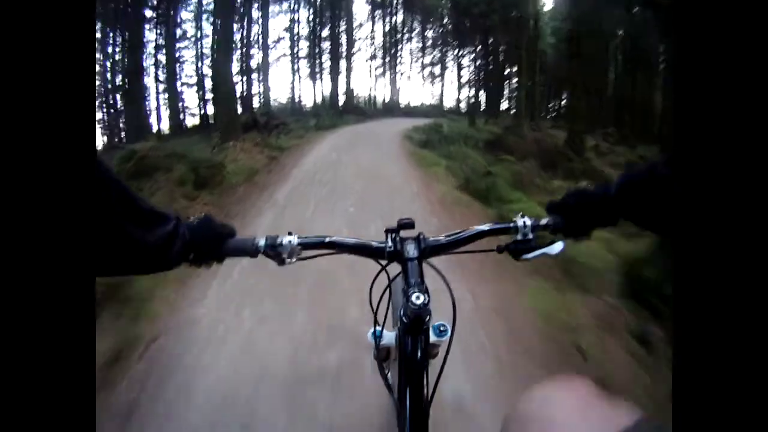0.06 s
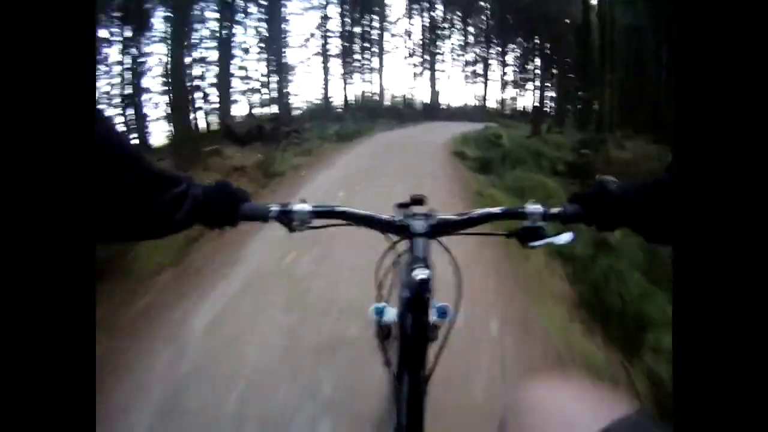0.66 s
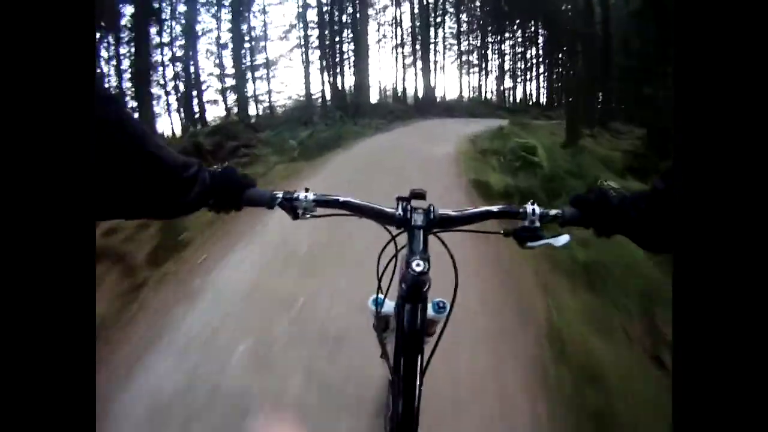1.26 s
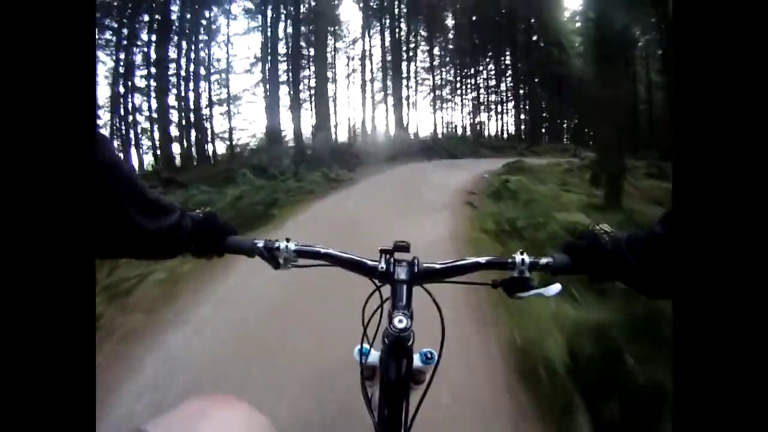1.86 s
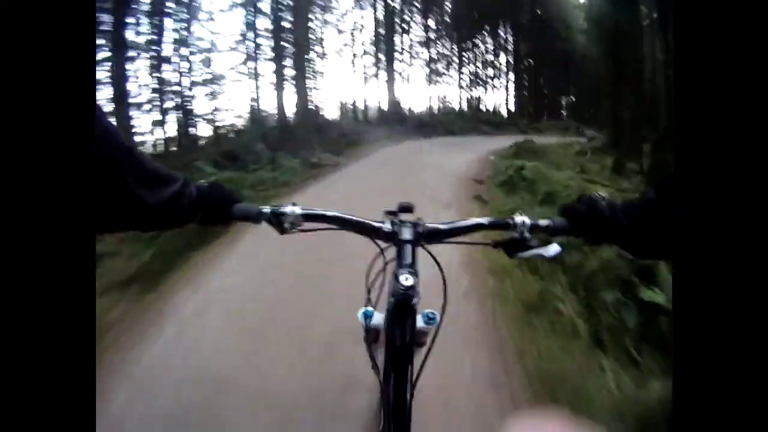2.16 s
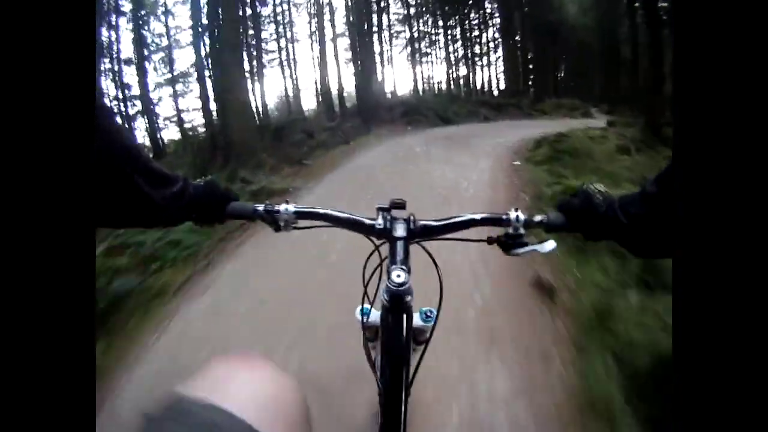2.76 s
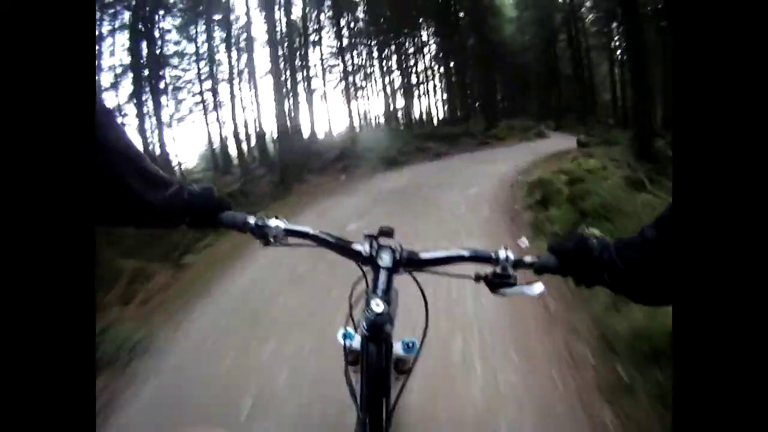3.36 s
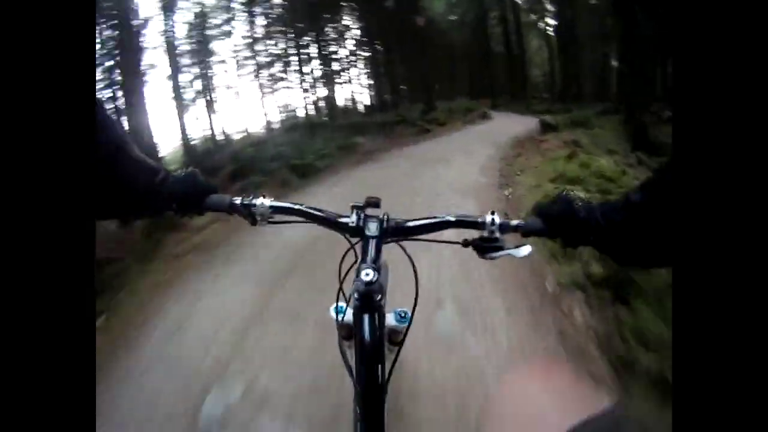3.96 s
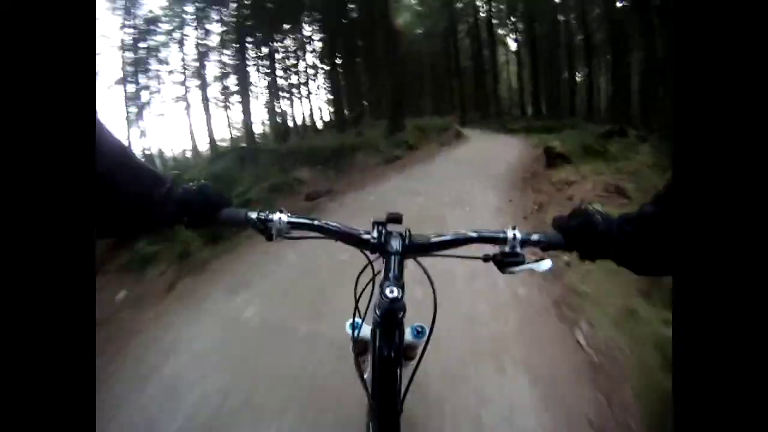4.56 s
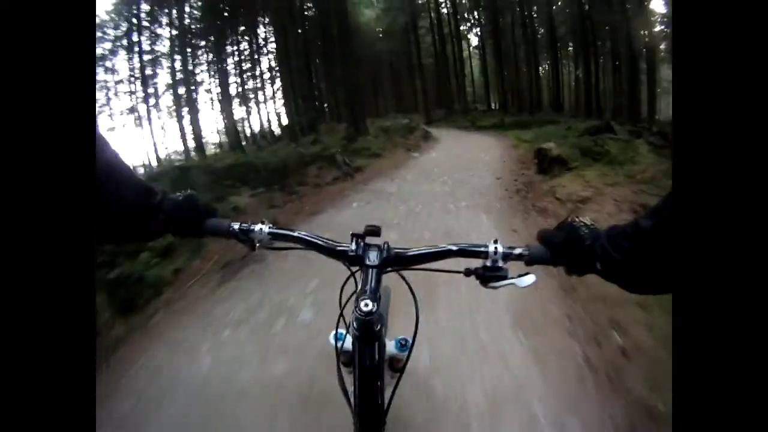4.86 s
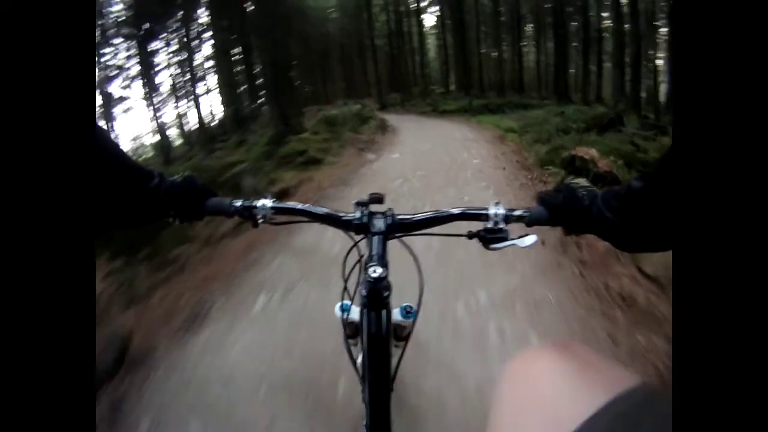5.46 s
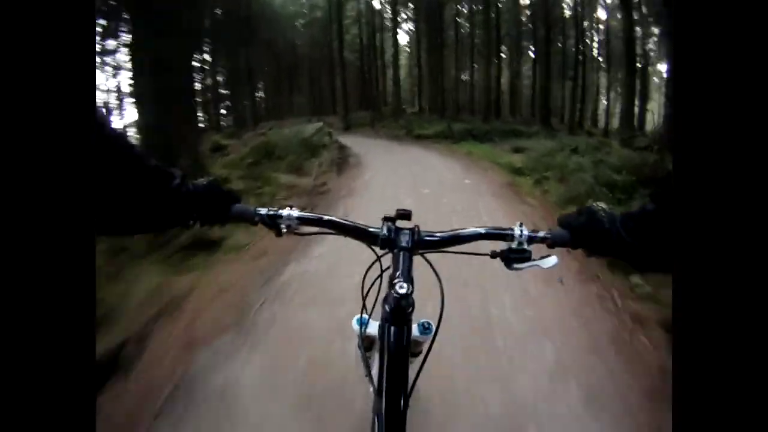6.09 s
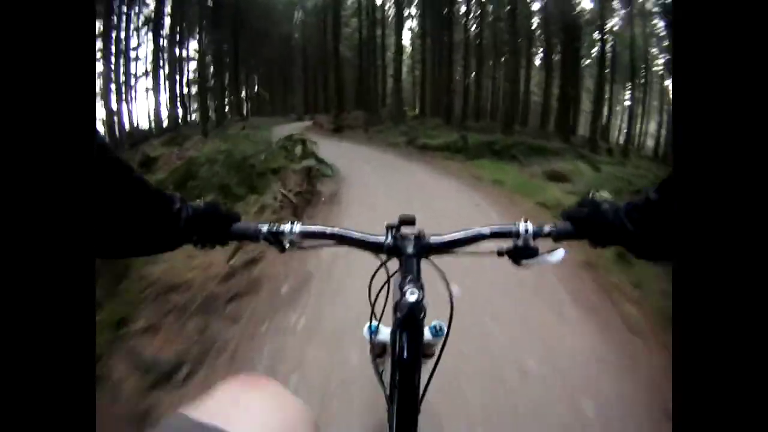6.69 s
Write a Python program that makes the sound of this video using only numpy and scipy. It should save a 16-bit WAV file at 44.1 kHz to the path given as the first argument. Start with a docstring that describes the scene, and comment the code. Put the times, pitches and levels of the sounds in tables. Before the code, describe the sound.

A mountain bike rolls fast along a gravel forest trail for nearly seven seconds, heard close from a camera in a plastic case on the rider's chest. The tyres crunch continuously with a gritty treble and short surges, above a low rumble of rough ground and gusting wind. At about 0.4 seconds the case knocks sharply, followed at once by a dull thump and a clack. A second strong jolt, with knock, thump and rattle, comes just before 2 seconds. From 2.5 to 4 seconds loose parts clack repeatedly and stones tick on the frame, among softer knocks and bumps. The crunch swells several times between 4.3 and 4.8 seconds. A small thump lands at 5 seconds, a gust at 5.4 and a clack at 5.9. The sharpest hollow knock hits at 6.3 seconds with a burst of gravel, before a last gust.

```python
"""Tyres crunch on gravel as a mountain bike runs fast down a forest trail, heard from a camera in a
plastic case on the rider's chest. The many small impacts excite the resonances of the case, while
wind and rough ground rumble below. Bumps thump, loose parts clack, stones tick on the frame and the
case knocks on its mount. The camera samples slowly and holds each sample, which mirrors the spectrum
into a gritty treble."""
import sys
import numpy as np
from scipy import signal
from scipy.fft import rfft, irfft, next_fast_len
from scipy.io import wavfile
from scipy.ndimage import map_coordinates

SR = 44100
rng = np.random.default_rng(int(sys.argv[2]) if len(sys.argv) > 2 else 0)


def bounce(signal):
    """Save signal as a 16-bit WAV file at the path given by the first command-line argument."""
    frames = np.transpose(np.atleast_2d(signal))
    limited = np.clip(frames, -1, 1)
    pcm = np.round(limited * 32767).astype(np.int16)
    wavfile.write(sys.argv[1], SR, pcm)


N = 296738

# gusts on the case: peak_s, level_db, length_s
GUSTS = [(0.536, -41, .25), (1.28, -39, 0.17), (1.625, -39, 0.46), (1.963, -38.5, .17), (2.624, -42, 0.22),
         (2.946, -54, 0.079), (3.55, -38.5, 0.13), (3.812, -42.5, 0.11), (4.13, -46, 0.22),
         (4.977, -37.5, 0.1), (5.406, -35, 0.15), (6.69, -33, 0.17)]
# rumble from the roughness of the ground: time_s, level_db
GROUND_LEVEL = [(0.1, -60.5), (0.4, -55.5), (0.8, -59), (1.5, -60.5), (1.9, -54), (2.15, -59), (2.5, -56),
                (3.1, -64), (3.45, -57.5), (4.27, -58), (4.45, -63), (4.7, -53.5), (4.9, -60), (5.35, -59),
                (6.0, -62.5), (6.27, -55.5), (6.73, -62)]
# spectra of the wind and the ground rumble: frequency_hz, level_db
WIND_SPECTRUM = [(10, -9.5), (18, 2.5), (26, 2.5), (36, -8), (50, -11.5), (70, -18.5), (130, -26),
                 (260, -56)]
RUMBLE_SPECTRUM = [(40, -9.5), (80, -0.5), (120, -4), (200, -4), (270, -9.5), (370, -20), (600, -21),
                   (1200, -34)]
# bumps that jolt the rider: start_s, level_db, pitch_hz
BUMPS = [(0.470, -20, 102), (1.827, -34, 110), (1.956, -23.5, 92), (2.020, -41, 129), (2.58, -37, 65),
         (2.989, -37.5, 54.6), (3.383, -36, 54.4), (5.009, -31, 78), (5.105, -45, 173), (6.181, -37, 61.5),
         (6.292, -34.5, 167)]
# modes of the jolted body: pitch_ratio, level_db, t60_s
BODY_MODES = [(1, 5, 0.042), (1.6, 0, 0.0394), (2.2, -20.5, 0.068)]
# knocks of the case on its mount: start_s, level_db, cutoff_hz
KNOCKS = [(0.372, -17, 1830), (0.489, -32.5, 1300), (1.029, -39, 900), (1.942, -17, 2600),
          (2.409, -39.5, 750), (2.531, -30.5, 725), (3.509, -31.5, 950), (4.061, -32.5, 734),
          (6.293, -13, 3360), (6.388, -45, 900)]
# clacks of loose parts and ticks of flung stones: start_s, level_db, pitch_hz
CLACKS = [(0.2169, -33.5, 2430), (0.4697, -22.5, 1780), (1.0801, -32.5, 1840), (1.4406, -41, 2030),
          (1.9545, -25.5, 1840), (1.984, -38.5, 2000), (2.618, -30.5, 1940), (2.6817, -31, 2160),
          (2.725, -35, 2000), (2.8442, -27, 1950), (2.9886, -38, 2000), (3.2575, -35.5, 2440),
          (3.4406, -30.5, 2640), (3.6682, -25.5, 2700), (3.724, -38.5, 2520), (4.458, -35, 1950),
          (5.4026, -36, 2030), (5.6391, -36.5, 1850), (5.7334, -37, 2020), (5.9224, -28, 2300),
          (5.932, -35, 2270), (6.4343, -36, 2630), (6.6502, -39.5, 2110)]
STONES = [(0.473, -40, 5340), (0.752, -46, 4300), (1.134, -45, 3100), (1.741, -35, 4120),
          (1.915, -44, 3100), (1.954, -36.5, 5100), (2.074, -44, 4800), (2.138, -40, 3570),
          (2.146, -42.5, 4600), (2.613, -42, 4600), (3.44, -40, 3500), (3.667, -41, 2970),
          (3.980, -53, 3400), (4.997, -51, 5560), (5.921, -42.5, 3200), (5.929, -45, 3200)]
# spectra of a knock, a clack and a stone's tick: frequency_hz, level_db
KNOCK_SPECTRUM = [(200, -24), (540, -31), (670, -4), (760, -8), (880, 5), (1050, -8.5), (1230, -5.5),
                  (1600, -10.5), (2170, -6.5), (2380, -18.5), (2520, -37), (2750, -24), (5500, -34)]
CLACK_SPECTRUM = [(600, -14), (1250, 0.5), (1430, -12), (1900, 4.5), (2550, 0.5), (2850, -14), (3120, -3),
                  (3400, -17.5), (5000, -22)]
STONE_SPECTRUM = [(1000, -27), (2500, -8), (3500, 5), (5000, -0.5), (6000, 0.5)]
# resonances of the case and spectrum of the grit: frequency_hz, level_db
CASE_SPECTRUM = [(250, -46), (550, -29), (750, -21), (900, -10.5), (1080, -14), (1220, -5), (1350, -10.5),
                 (1650, -9), (2000, 1), (2200, -1.5), (2380, -24), (2550, -8.5), (2820, -30), (5800, -29)]
GRIT_SPECTRUM = [(300, -4.5), (600, -9), (1250, 0.5), (1700, -7.5), (2550, 6.5), (2820, -8), (3100, -1),
                 (3400, -4), (4650, -12.5), (4930, -7), (5200, -16.5), (6000, -17.5)]
# crunch of steady rolling: time_s, level_db
ROLL_LEVEL = [(0.1, -52.5), (0.33, -56.5), (0.55, -53.5), (1.1, -49), (1.33, -55.5), (1.8, -50),
              (2.05, -53.5), (2.4, -57.5), (2.6, -48.5), (2.9, -58), (3.3, -54), (3.85, -53), (4.4, -55),
              (4.7, -52), (4.87, -54.5), (5.2, -55.5), (6.05, -54), (6.73, -56)]
# the tread bites into looser gravel: peak_s, level_db, length_s
BITES = [(0.157, -42.5, 0.072), (0.252, -50.5, 0.075), (0.411, -40, 0.069), (0.625, -51, 0.061),
         (0.864, -42.5, 0.044), (1.02, -48, 0.089), (1.117, -44.5, 0.072), (1.217, -45.5, 0.027),
         (1.455, -42, 0.024), (1.577, -43, 0.082), (1.774, -48, .05), (1.97, -49.5, 0.049),
         (2.149, -48, 0.047), (2.307, -40.5, 0.034), (2.485, -49, 0.056), (2.628, -48.5, 0.18),
         (2.678, -40, 0.039), (2.75, -41, 0.058), (2.951, -48, 0.036), (3.093, -44, 0.088),
         (3.181, -49.5, 0.038), (3.984, -51, 0.016), (4.090, -46.5, 0.074), (4.271, -37, 0.061),
         (4.577, -39.5, 0.059), (4.641, -42, 0.043), (4.735, -45, 0.086), (4.797, -39, 0.039),
         (5.365, -41, 0.034), (5.415, -43.5, 0.039), (5.744, -43, 0.037), (6.208, -44.5, 0.17),
         (6.290, -34.5, 0.076), (6.345, -43.5, 0.034), (6.397, -44.5, 0.028), (6.588, -49, .03)]


def amp(db):
    """Decibels to gain."""
    return 10 ** (np.asarray(db) / 20)


def unit(x):
    """x scaled to rms 1."""
    return x / np.sqrt(np.mean(x ** 2) + 1e-20)


def curves(rows):
    """One value per sample for each column after the time."""
    s, *cols = np.transpose(rows)
    return [np.interp(np.arange(N) / SR, s, c) for c in cols]


def wobble(rate):
    """A smooth random curve, rate knots a second."""
    return map_coordinates(rng.standard_normal(int(N * rate / SR) + 4), [np.arange(N) * rate / SR])


def coloured(x, points):
    """x through a causal filter with the given (Hz, dB) shape."""
    m = 2 * next_fast_len((len(x) + SR // 10) // 2)
    hz, db = np.transpose(points)
    shape = np.interp(np.log(np.fft.rfftfreq(m, 1 / SR) + 1), np.log(hz), db)
    cepstrum = irfft(np.log(amp(shape)), m)
    cepstrum[1:m // 2] *= 2
    cepstrum[m // 2 + 1:] = 0
    return irfft(rfft(x, m) * np.exp(rfft(cepstrum)), m)[:len(x)]


def grains(rate, spread_db):
    """Tiny contacts at random moments, a few much harder than the rest."""
    hit = rng.random(N) < rate / SR
    size = amp(spread_db * np.clip(rng.standard_normal(N), -2, 2))
    return unit(hit * size * rng.choice([-1, 1], N))


def burst(rise, t60):
    """A chattering contact: noise that swells and dies within milliseconds."""
    t = np.arange(SR // 10) / SR
    return rng.standard_normal(len(t)) * (1 - np.exp(-t / rise)) ** 2 * amp(-60 * t / t60)


def add(track, s, sound):
    """Mix a sound into the track at time s."""
    part = track[max(round(s * SR), 0):][:len(sound)]
    part += sound[:len(part)]


def peaking(x, db):
    """x scaled to a peak level."""
    return amp(db) * x / np.abs(x).max()


def swelling(base_db, rows, rise, fall, shape):
    """Level in dB of a steady base plus swells that each build up and release."""
    t = np.arange(N) / SR
    power = amp(base_db) ** 2 * np.ones(N)
    for s, db, length in rows:
        near = slice(*np.searchsorted(t, [s - 2 * length, s + 2 * length]))
        away = np.abs(t[near] - s) / (length * np.where(t[near] < s, rise, fall))
        power[near] += (amp(db) * np.exp(-away ** shape)) ** 2
    return 10 * np.log10(power)


def wind(gain_db=-2, headwind_db=-44, flutter_db=-0.5):
    """Turbulence: a headwind and its gusts buffet the case with low-frequency pressure noise."""
    level_db = swelling(headwind_db, GUSTS, rise=0.51, fall=1, shape=1.4)  # shape 1 is pointed, 2 round
    turbulence = rng.standard_normal(N) * amp(flutter_db * wobble(31))
    return amp(level_db + gain_db) * unit(coloured(turbulence, WIND_SPECTRUM))


def ground_rumble(gain_db=2.5, flutter_db=3.5):
    """Forced vibration: rough ground shakes the case in quick, uneven jolts."""
    level_db, = curves(GROUND_LEVEL)
    jolts = grains(rate=900, spread_db=2) * amp(flutter_db * wobble(40))
    return amp(level_db + gain_db) * unit(coloured(jolts, RUMBLE_SPECTRUM))


def bumps(rise_s=0.003):
    """Damped free vibration: each bump excites low body modes that die away as a dull thump."""
    track = np.zeros(N)
    t = np.arange(SR // 5) / SR
    onset = 1 - np.exp(-(t / rise_s) ** 2)
    for s, db, hz in BUMPS:
        thump = sum(amp(mode_db - 60 * t / t60) * np.sin(2 * np.pi * hz * ratio * t)
                    for ratio, mode_db, t60 in BODY_MODES)
        add(track, s, peaking(thump * onset, db))
    return track


def case_knocks(touch_db=-9, seat_s=0.00122):
    """Impulse response: the case touches its mount lightly, then seats hard and rings hollow."""
    track = np.zeros(N)
    contacts = np.zeros(SR // 10)
    contacts[0] = amp(touch_db)
    contacts[round(seat_s * SR)] = -1
    for s, db, cutoff_hz in KNOCKS:
        softness = signal.butter(2, cutoff_hz, fs=SR, output='sos')  # a gentle contact is dull
        blow = signal.sosfilt(softness, contacts)
        add(track, s, peaking(coloured(blow, KNOCK_SPECTRUM), db))
    return track


def rattle(hits, spectrum, width_hz, rise_s, t60_s, gain_db=1):
    """Heavily damped resonance: a loose part or a stone chatters briefly in one broad band."""
    track = np.zeros(N)
    for s, db, hz in hits:
        resonance = signal.iirpeak(hz, hz / width_hz, fs=SR)
        chatter = signal.lfilter(*resonance, burst(rise_s, t60_s))
        add(track, s, peaking(coloured(chatter, spectrum), db + gain_db))
    return track


def tyres(crunch_db=-1.5, pebble_db=-10, grit_db=-56, spray_follow=0.41,
          clump_db=2, uneven_db=2.56, grit_flutter_db=2.5):
    """Shot noise: stones crush in clumps and ring in the case, over a spray of grit and pebbles."""
    roll_db, = curves(ROLL_LEVEL)
    level_db = swelling(roll_db + uneven_db * wobble(22), BITES, rise=0.5, fall=0.44, shape=1.9)
    clumping_db = clump_db * wobble(130)
    crushing = grains(rate=7000, spread_db=3.5) * amp(clumping_db)
    crunch = unit(coloured(crushing, CASE_SPECTRUM))
    pebbles = unit(coloured(grains(rate=60, spread_db=1.0), CLACK_SPECTRUM))
    scatter = grains(rate=5000, spread_db=3.0) * amp(.5 * clumping_db + grit_flutter_db * wobble(60))
    grit = unit(coloured(scatter, GRIT_SPECTRUM))
    spray = amp(grit_db) * grit + amp(level_db.mean() + pebble_db) * pebbles
    # the spray swells less than the crunch when the tyres bite
    spray_swell_db = spray_follow * (level_db - level_db.mean())
    return amp(level_db + crunch_db) * crunch + amp(spray_swell_db) * spray


def scene():
    """Superposition: all sources add at one microphone, at close range in open air."""
    ride = tyres() + wind() + ground_rumble() + case_knocks() + bumps()
    clacks = rattle(CLACKS, CLACK_SPECTRUM, width_hz=1300, rise_s=0.00069, t60_s=0.02)
    stone_ticks = rattle(STONES, STONE_SPECTRUM, width_hz=1600, rise_s=0.0019, t60_s=0.012)
    return (ride + clacks + stone_ticks)[None]


def record(dry, unmute_s=0.077, fade_s=0.0078, muted_db=-55, hold_hz=12000, top_hz=15800):
    """Zero-order hold: the input unmutes, and held samples mirror it about their sampling rate."""
    opening = np.clip((np.arange(N) / SR - unmute_s) / fade_s + .5, 0, 1)
    sound = dry * amp(muted_db * (1 - opening))
    slow = signal.resample_poly(sound, hold_hz, SR, axis=1)
    anti_alias = signal.firwin(41, 5750, fs=hold_hz)  # leaves a dark gap at half the sampling rate
    slow = signal.fftconvolve(slow, anti_alias[None], 'same', axes=1)
    staircase = np.repeat(slow, 8, axis=1)
    held = signal.resample_poly(staircase, SR, 8 * hold_hz, axis=1)[:, :N]
    band_limit = signal.firwin(255, top_hz, fs=SR, window='blackman')
    return signal.fftconvolve(held, band_limit[None], 'same', axes=1)


dry = scene()
out = record(dry)
bounce(out)
```